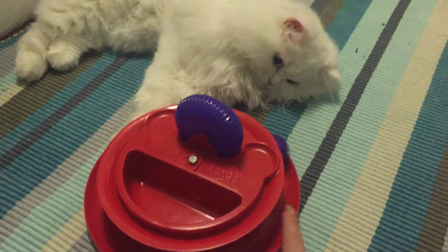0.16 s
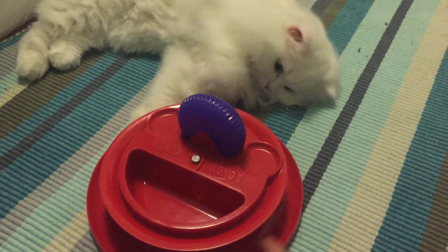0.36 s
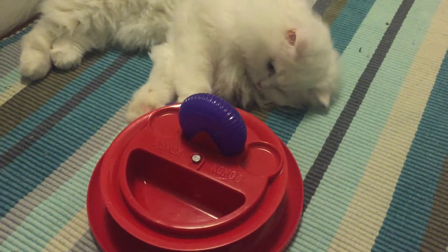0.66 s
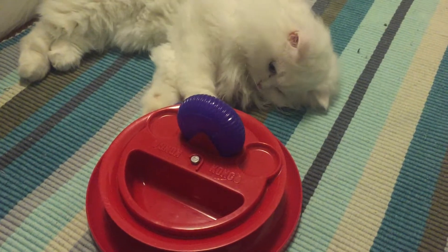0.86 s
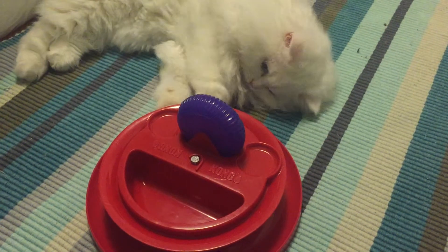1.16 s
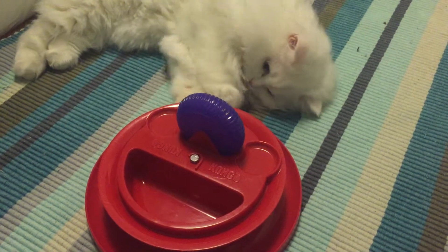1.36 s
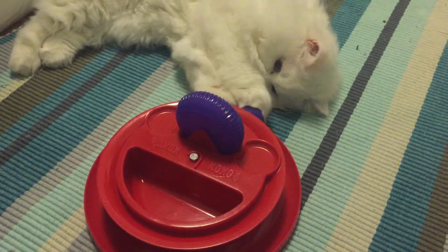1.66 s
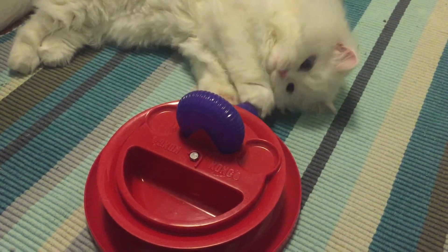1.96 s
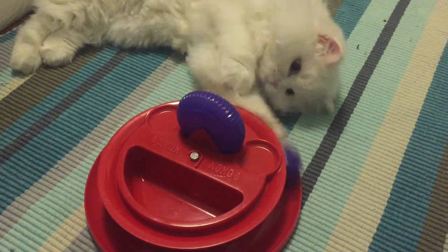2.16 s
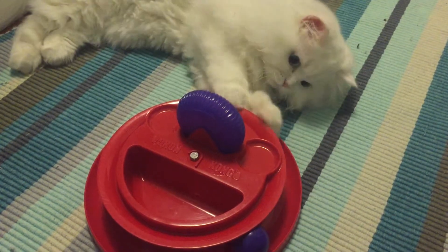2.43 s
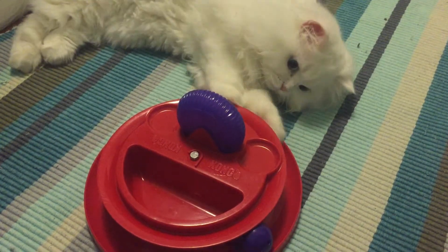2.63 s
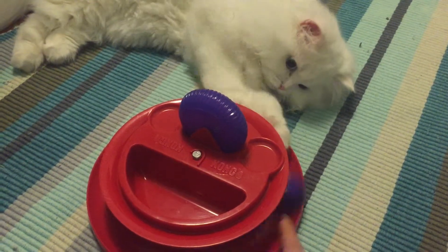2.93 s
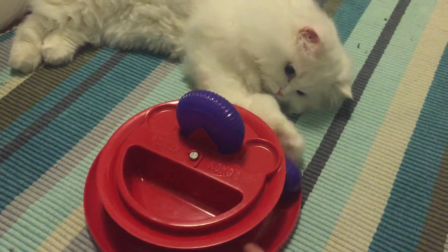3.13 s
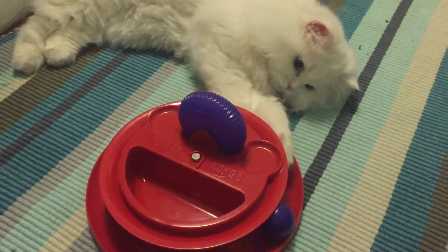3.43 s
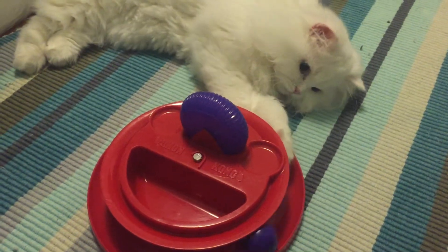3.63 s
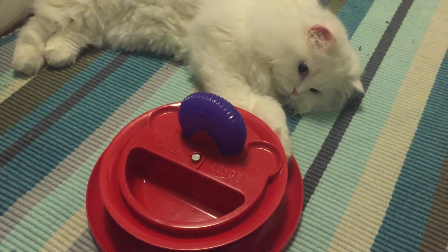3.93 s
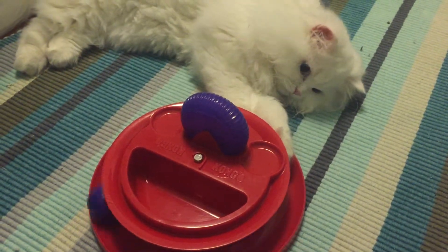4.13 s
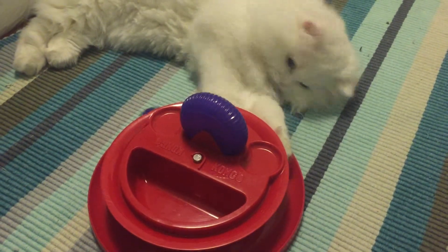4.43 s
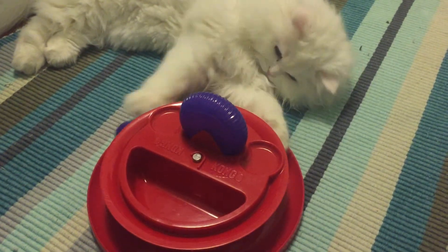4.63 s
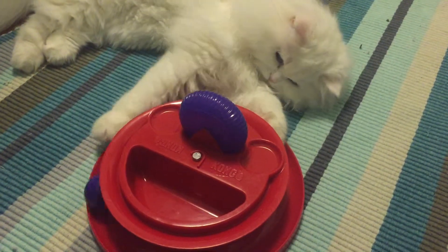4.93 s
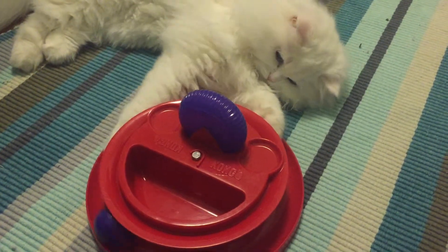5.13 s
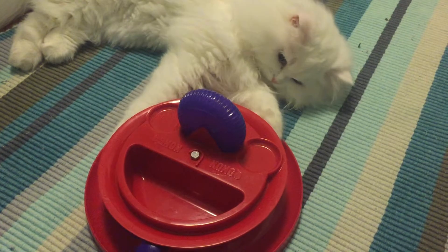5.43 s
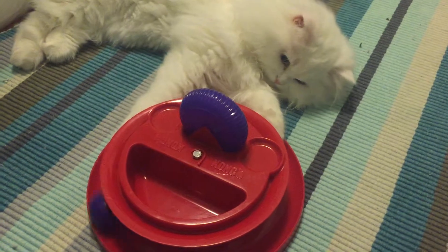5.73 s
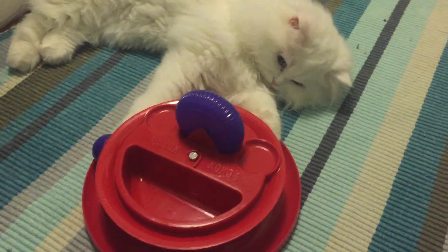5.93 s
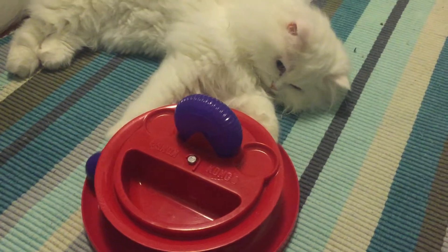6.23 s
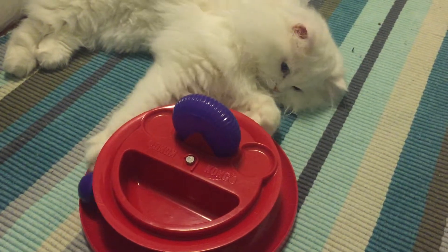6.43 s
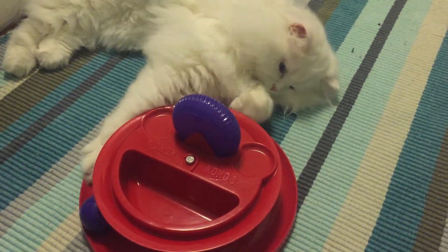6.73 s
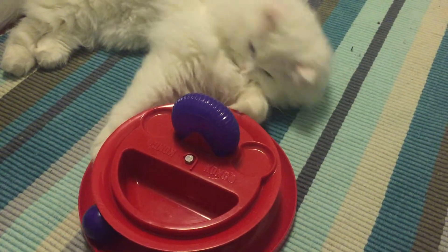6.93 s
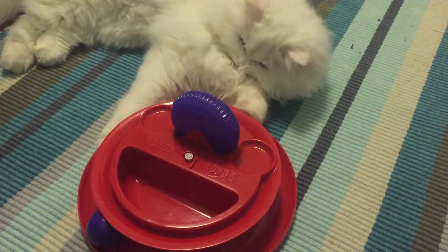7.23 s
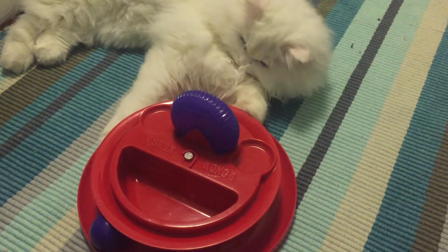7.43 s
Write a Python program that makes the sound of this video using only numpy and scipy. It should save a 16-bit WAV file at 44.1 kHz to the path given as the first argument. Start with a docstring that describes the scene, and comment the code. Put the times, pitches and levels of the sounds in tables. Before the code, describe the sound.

Close-up of a cat's toy: a jingling hard plastic ball rolls, ticks and knocks along its circular track, then fades to faint ticks in a quiet room.

```python
"""A hollow plastic ball with a small bell inside rolls and bounces round a plastic track toy in a quiet room.
Contacts crowd the first 0.7 s and thin out; the hardest come near 2.3 s, then a busy run lasts to about 6.1 s.
Weak ticks and tinkles close the scene; now and then up to 6.5 s a paw thumps softly on the floor.
Contacts excite decaying modes of shell, track wall, hollow base and bell; rolling excites them with many tiny
impacts and friction noise. The paw shakes low floor modes, and an echo and a faint hush surround the toy."""
import sys
import numpy as np
from scipy import signal
from scipy.fft import rfft, irfft, next_fast_len
from scipy.io import wavfile
from scipy.ndimage import uniform_filter1d, map_coordinates

SR = 44100
rng = np.random.default_rng(int(sys.argv[2]) if len(sys.argv) > 2 else 0)


def generate_wav(sig):
    """Save sig (samples, or channels by samples) to the path in sys.argv[1] as 16-bit PCM at SR."""
    pcm = np.round(np.clip(np.atleast_2d(sig).T, -1, 1) * 32767).astype(np.int16)
    wavfile.write(sys.argv[1], SR, pcm)


N = 334278  # samples

# the ball's travel, with control levels for base and rattle and the base pitch under the ball:
# start_s [s], base_db [dB], rattle_db [dB], pitch_hz [Hz]
TRAVEL = [(0.0, -57.5, -67.5, 362), (0.44, -50, -54.5, 399), (0.55, -47.5, -83, 354),
          (0.67, -65.5, -67, 396), (0.97, -86, -70.5, 363), (1.48, -82, -70, 392), (1.81, -94, -76, 350),
          (2.13, -68, -73.5, 393), (2.26, -62, -46, 324), (2.38, -59, -48.5, 376), (2.81, -83, -85, 360),
          (3.02, -75, -47.5, 380), (3.17, -56.5, -52.5, 385), (3.74, -65.5, -82.5, 328),
          (3.88, -64, -61.5, 351), (4.2, -52.5, -55.5, 323), (4.77, -55, -57.5, 403),
          (5.0, -56.5, -71, 328), (5.36, -58, -63.5, 332), (5.51, -63, -62.5, 330), (5.74, -63, -82, 364),
          (5.87, -45.5, -47, 333), (5.97, -50, -73, 358), (6.16, -64.5, -74.5, 387),
          (7.24, -76, -77.5, 350), (7.58, -83, -84.5, 350)]
# ticks on the ball's hard shell: start_s [s], level_db [dB], centre_hz [Hz]
SHELL_TICKS = [(0.0362, -24, 11300), (0.136, -28, 10800), (0.204, -28.5, 10400), (0.232, -25, 10400),
               (0.2508, -43, 12700), (0.285, -33, 12300), (0.3853, -27, 10100), (0.416, -32, 10400),
               (0.4756, -28, 7800), (0.5252, -20.5, 7800), (0.537, -38, 7100), (0.5685, -15.5, 7700),
               (0.617, -26, 9200), (0.6347, -29, 8750), (0.681, -33.5, 7800), (0.717, -44, 7200),
               (1.019, -44.5, 6900), (1.2094, -31, 5400), (1.57, -41, 11300), (1.6288, -35.5, 7800),
               (1.652, -47, 7400), (2.1591, -19, 9400), (2.182, -28, 7460), (2.209, -28.5, 9200),
               (2.2473, -19, 7500), (2.3022, -9, 8540), (2.3185, -24.5, 7760), (2.3354, -24.5, 7100),
               (2.4, -13, 8700), (2.423, -16.5, 7900), (2.431, -30, 8700), (2.453, -15, 8150),
               (2.568, -33, 9600), (2.5788, -21.5, 11200), (2.603, -25.5, 12500), (2.6868, -25.5, 8440),
               (2.7239, -32, 12100), (2.9836, -15.5, 10500), (3.0216, -19, 9200), (3.0385, -21, 9650),
               (3.0538, -22, 10100), (3.059, -14, 10700), (3.0661, -16.5, 6800), (3.0727, -24.5, 7660),
               (3.0768, -36, 10600), (3.0883, -17, 9300), (3.1038, -36, 8500), (3.169, -32, 11200),
               (3.1872, -17, 8100), (3.2218, -19.5, 11200), (3.2401, -22.5, 7550), (3.26, -36, 7600),
               (3.318, -30, 10200), (3.3491, -26.5, 8600), (3.3669, -25.5, 9200), (3.4076, -32.5, 7150),
               (3.5041, -26.5, 8100), (3.549, -27, 11200), (3.5717, -29, 10500), (3.635, -31.5, 7900),
               (3.6617, -30.5, 12400), (4.0126, -23.5, 9400), (4.042, -29.5, 8100), (4.0776, -15, 8530),
               (4.1388, -19, 10200), (4.1654, -16.5, 9000), (4.2926, -33, 10300), (4.311, -26, 12400),
               (4.4349, -29.5, 8040), (4.4598, -31.5, 6700), (4.484, -31.5, 9200), (4.5177, -32, 7200),
               (4.613, -17, 7700), (4.627, -32.5, 8900), (4.7028, -32, 9000), (4.73, -32, 9400),
               (4.7929, -28, 8400), (4.848, -32.5, 9000), (4.879, -34, 9150), (4.927, -33, 11600),
               (4.9458, -27, 10300), (5.143, -20.5, 7140), (5.1894, -19.5, 8600), (5.2338, -32, 11700),
               (5.2512, -32.5, 7100), (5.2645, -28.5, 7900), (5.284, -26.5, 10300), (5.364, -31, 8700),
               (5.393, -27, 7650), (5.6886, -22, 9600), (5.7148, -23.5, 8900), (5.7518, -23, 7600),
               (5.8204, -16.5, 9200), (5.858, -25, 9400), (5.895, -30, 9700), (5.917, -25, 10800),
               (6.035, -33, 11800), (6.058, -30, 9200), (6.317, -48.5, 6900), (6.3305, -43, 12700),
               (6.4257, -45.5, 9100), (6.485, -39.5, 12250), (6.612, -45.5, 11100), (6.6685, -48, 11100),
               (6.7393, -45, 11500), (6.9416, -43, 11800), (7.108, -43.5, 10530), (7.123, -42, 11400)]
# knocks of the ball on the track wall: start_s [s], level_db [dB], centre_hz [Hz]
WALL_KNOCKS = [(0.0488, -34.5, 1980), (0.0992, -28.5, 1180), (0.1171, -26, 2220), (0.2019, -36, 2230),
               (0.2389, -32, 1900), (0.3865, -37, 2260), (0.4835, -25, 1800), (0.5072, -21.5, 1760),
               (0.5236, -19.5, 2000), (0.5546, -25.5, 1730), (0.5684, -20.5, 2370), (0.617, -22.5, 2040),
               (0.6808, -32, 2150), (0.6978, -35, 2090), (1.0186, -45.5, 1930), (1.0296, -48, 2930),
               (1.2046, -34.5, 2340), (1.2094, -19, 2130), (1.407, -48.5, 1880), (1.4436, -35.5, 1400),
               (1.5658, -29, 1240), (1.6295, -29.5, 1830), (1.6511, -46, 1810), (2.0718, -42, 1640),
               (2.1137, -31, 1650), (2.1306, -27.5, 1900), (2.16, -26, 2940), (2.2084, -36, 3000),
               (2.2491, -6, 2080), (2.4013, -16.5, 1270), (2.4224, -23.5, 2330), (2.4543, -29, 1900),
               (2.579, -25.5, 2000), (2.6039, -35, 1870), (2.6867, -34, 2870), (2.7646, -41, 1500),
               (2.8799, -45.5, 1800), (2.9848, -18.5, 1960), (3.0124, -20, 2740), (3.0869, -26.5, 2620),
               (3.1253, -29, 1810), (3.1448, -45, 2100), (3.1847, -31, 2730), (3.2212, -26.5, 2230),
               (3.3475, -35, 1570), (3.4084, -37.5, 2260), (3.5043, -36, 2610), (3.5344, -45, 3000),
               (3.6341, -44, 2990), (3.6616, -43.5, 2690), (3.8427, -47.5, 2730), (3.9045, -46, 2930),
               (3.9818, -45, 1490), (4.0124, -35, 2640), (4.0514, -29.5, 2270), (4.0731, -27.5, 1760),
               (4.1654, -24, 2410), (4.301, -28.5, 2500), (4.351, -25, 1430), (4.5625, -34.5, 2350),
               (4.6122, -23, 2130), (4.6274, -31.5, 2500), (4.7288, -30, 1220), (4.793, -32.5, 2680),
               (4.8807, -30.5, 2500), (5.1425, -29.5, 2880), (5.234, -32, 2270), (5.2639, -38, 2790),
               (5.3627, -52, 2450), (5.3948, -51, 2430), (5.6989, -35, 1810), (5.7498, -26, 2670),
               (5.8197, -24.5, 2240), (5.8646, -31.5, 1770), (5.9836, -22.5, 1510), (6.0571, -32, 2230),
               (6.0766, -27, 1225), (6.084, -33, 1195), (6.0964, -34, 1260), (6.5311, -51, 2360),
               (6.5622, -46, 2200), (6.6238, -45, 1230), (6.8209, -50, 2460), (6.8374, -44, 2620),
               (6.9754, -53, 2720)]
# strokes of the pellet in the bell: start_s [s], level_db [dB]
BELL_STROKES = [(0.1316, -41), (0.5242, -43), (0.5681, -39), (0.617, -36), (1.4087, -54), (1.5663, -56),
                (1.6526, -49), (2.159, -29.5), (2.2363, -28.5), (2.3017, -26), (2.4079, -13),
                (2.5701, -25.5), (2.6868, -41), (2.7347, -39), (3.037, -27), (3.054, -33), (3.0879, -29),
                (3.2231, -30), (3.3578, -32.5), (3.5154, -36.5), (3.5384, -33), (3.6506, -39),
                (3.8586, -35.5), (3.9185, -38.5), (4.0253, -31), (4.0776, -21), (4.0951, -28),
                (4.1684, -23.5), (4.3036, -27.5), (4.4687, -34), (4.5211, -40), (4.6164, -26),
                (4.768, -33.5), (4.9402, -30.5), (5.1893, -29), (5.221, -36), (5.3138, -34),
                (5.3627, -30.5), (5.434, -34), (5.4685, -31.5), (5.5448, -34), (5.5678, -38),
                (5.6965, -32.5), (5.8264, -27), (5.9045, -34), (5.9284, -30.5), (6.1285, -36),
                (6.4213, -45.5), (6.6109, -48), (6.9784, -45.5), (7.0035, -48), (7.1227, -49),
                (7.2429, -49)]
# modes of the hollow base: pitch_hz [Hz], level_db [dB, relative], t60_s [s]
BASE_MODES = [(316.3, -8.5, 0.073), (369.4, -3, 0.071), (444.6, -6, 0.04), (562.4, -16, 0.21)]
# modes of the track wall and trough: pitch_hz [Hz], level_db [dB, relative], t60_s [s]
WALL_MODES = [(704, -3.5, 0.029), (979, -3.5, 0.024), (1135, -6.5, 0.026), (1294, -0.5, 0.0079),
              (1596, -2.5, 0.013), (1896, -4.5, 0.022), (2150, 4.5, 0.0092), (2402, 1, 0.011),
              (2790, 4.5, 0.0088), (2880, -10.5, 0.021), (3253, -6.5, 0.012), (3947, 0.5, 0.0046),
              (4350, -12, 0.014)]
# modes of the ball's shell: pitch_hz [Hz], level_db [dB, relative], t60_s [s]
SHELL_MODES = [(3593, 5, 0.0072), (4330, -9, 0.0039), (5743, -4.5, 0.0068), (6377, -11, 0.0034),
               (6830, -9.5, 0.01), (8310, -7.5, 0.0061), (9313, -12.5, 0.0058), (12000, -16.5, 0.0046),
               (11580, -1.5, 0.0036), (13260, -6, 0.0056), (14600, -7, 0.0061)]
# modes of the small bell: pitch_hz [Hz], level_db [dB, relative], t60_s [s]
BELL_MODES = [(9206, -10.5, 0.075), (9180, -14, 0.039), (9380, -4.5, 0.023), (10270, -21.5, 0.026)]


def amp(db):
    """Decibel law: the amplitude gain of a level in dB."""
    return 10 ** (np.asarray(db) / 20)


def unit(x):
    """Power normalisation: x at rms 1."""
    return x / np.sqrt(np.mean(x ** 2) + 1e-20)


def peak_one(blows):
    """Peak normalisation: each row at peak 1."""
    return blows / np.abs(blows).max(axis=1, keepdims=True)


def along(points, hz):
    """Logarithmic frequency scale: (Hz, value) points interpolated on a log axis."""
    f, v = np.transpose(points)
    return np.interp(np.log(hz + 1), np.log(f + 1), v)


def curves(rows):
    """Linear interpolation: one value per sample for each column after the time."""
    s, *columns = np.transpose(rows)
    return [np.interp(np.arange(N) / SR, s, c) for c in columns]


def wobble(rate):
    """Slow random modulation: a smooth curve through rate random knots a second."""
    return map_coordinates(rng.standard_normal(N // 100), [np.arange(N) * rate / SR])


def filtered(x, response):
    """Linear filtering: the spectrum of x times a response of frequency."""
    m = next_fast_len(N + 8192)
    return irfft(rfft(x, m) * response(np.fft.rfftfreq(m, 1 / SR)), m)[..., :N]


def ring(modes, centre_hz, focus_db, scatter_db, detune, rise):
    """Modal superposition: per centre, a peak-1 blow of decaying sines with random level, tuning and phase."""
    t = np.arange(SR // 10) / SR
    centre_hz = np.asarray(centre_hz)[:, None]
    chance = rng.standard_normal((len(centre_hz), len(modes), 3, 1))
    blows = 0
    for k, (hz, db, t60) in enumerate(modes):
        # focus_db is the loss at one octave from the centre; it grows with the square of the distance
        level_db = db - focus_db * np.log2(hz / centre_hz) ** 2 + scatter_db * chance[:, k, 0]
        tuned_hz = hz * (1 + detune * chance[:, k, 1])
        blows = blows + amp(level_db - 60 * t / t60) * np.sin(2 * np.pi * tuned_hz * t + chance[:, k, 2])
    return peak_one(blows * (1 - np.exp(-t / rise)))


def struck(times, db, blows):
    """Superposition of events: each blow is added at its time and level."""
    at = np.round(np.asarray(times) * SR).astype(int)[:, None] + np.arange(blows.shape[1])
    return np.bincount(at.ravel(), (amp(db)[:, None] * blows).ravel(), N + SR)[:N]


def bumps(rate, spread_db):
    """Random impulse train: rate impacts a second; spread_db above 0 makes a few harder, below 0 a few weaker."""
    draw = rng.random((2, N))
    return (draw[0] < rate / SR) * amp(-spread_db * np.log(draw[1] + 0.0084))


def rubbed(modes, centre_hz, focus_db, detune, rate, spread_db, smooth, roam_db):
    """Source-filter excitation: impacts and friction noise at six roaming places are convolved with modal blows."""
    force = []
    for place in range(6):
        presence = amp(roam_db * wobble(12))
        rub = unit(bumps(rate, spread_db)) + smooth * rng.standard_normal(N)
        force.append(presence * rub)
    # each place has its own colour
    centres_hz = centre_hz * (1 + detune) ** np.linspace(-6, 6, len(force))
    blows = ring(modes, centres_hz, focus_db, scatter_db=8.5, detune=detune, rise=0.00008)
    return unit(signal.fftconvolve(force, blows, axes=1)[:, :N].sum(axis=0))


def with_settling(roll_db, rows, under_db):
    """Power addition: gain of the rolling plus the decaying chatter after each contact, under_db from its level."""
    settle_s = 0.046  # time in which the chatter loses 10 dB
    s, db = np.transpose(rows)[:2]
    t = np.arange(SR // 2) / SR
    fade = np.tile(10 ** (-t / settle_s), (len(s), 1))
    chatter_power = struck(s, 2 * (db + under_db), fade)
    return np.sqrt(amp(2 * roll_db) + chatter_power)


def gritty(blows, depth, seconds):
    """Amplitude modulation by noise: a fast random tremor smears the modes into a dry plastic clack."""
    width = max(round(seconds * SR), 1)
    tremor = unit(uniform_filter1d(rng.standard_normal(blows.shape), width, axis=1))
    return peak_one(blows * (1 + depth * tremor))


def cracked(blows):
    """Broadband impact transient: each blow starts with a short, slightly dull snap of noise."""
    crack_db, crack_s, crack_hz = -3.5, 0.002, 4450  # initial rms against the blow's peak, t60, low-pass edge
    t = np.arange(blows.shape[1]) / SR
    noise = signal.lfilter(*signal.butter(4, crack_hz, fs=SR), rng.standard_normal(blows.shape))
    return blows + amp(crack_db - 60 * t / crack_s) * unit(noise)


def hush():
    """Stationary coloured noise: distant house rumble and microphone hiss with a slowly drifting level."""
    # the room at rest: pitch_hz [Hz], level_db [dB per Hz, relative]
    spectrum = [(15, -38), (28, -15), (76, 9.5), (140, -2), (225, -11), (500, -16.5), (1200, -27.5),
                (2000, -21), (6900, -23), (11800, -25), (15200, -29), (16400, -31)]
    level = amp(-71 + 0.37 * wobble(0.97))
    noise = filtered(rng.standard_normal(N), lambda hz: amp(along(spectrum, hz)))
    return level * unit(noise)


def room(x):
    """Frequency-dependent reverberation: noise tails decay at their own rates, drawn anew each quarter second."""
    # reverberation: pitch_hz [Hz], t60_s [s]
    decay = [(300, 0.4), (2000, 0.29), (10000, 0.21)]
    out, step = np.zeros(N + 2 * SR), SR // 4
    for start in range(0, N, step):
        hz, t, z = signal.stft(rng.standard_normal(SR // 2), SR, nperseg=256)
        fade = amp(-60 * t / along(decay, hz)[:, None])
        tail = signal.istft(z * fade, SR, nperseg=256)[1]
        answer = signal.fftconvolve(x[start:start + step], tail / np.linalg.norm(tail))
        out[start + 200:][:len(answer)] += answer  # 200 samples of delay
    return out[:N]


def paw():
    """Resonance under a soft force: a short swell of noise from the pad excites the low modes of the floor."""
    # paw on the floor: start_s [s], level_db [dB], centre_hz [Hz], decay_s [s]
    thumps = [(0.37, -53, 96.9, 0.03), (0.519, -41, 197, 0.011), (1.489, -47, 99, 0.072),
              (1.778, -39.5, 152, 0.031), (2.236, -65, 215, 0.027), (2.385, -41.5, 188, 0.016),
              (3.02, -49, 210, 0.022), (4.028, -47.5, 161, 0.022), (6.456, -59, 69.7, 0.022)]
    # modes of the floor boards: pitch_hz [Hz], level_db [dB, relative], t60_s [s]
    floor_modes = [(65, -3.5, .12), (91.5, -8.5, 0.31), (143, 2.5, 0.024), (171, -5, 0.16)]
    s, level_db, hz, decay_s = np.transpose(thumps)
    t = np.arange(SR // 4) / SR
    swell = np.tanh(t / 0.027) * np.exp(-t / decay_s[:, None])
    boards = ring(floor_modes, hz, focus_db=15.0, scatter_db=4.5, detune=0.17, rise=0.0029)
    shake = signal.fftconvolve(swell * rng.standard_normal((len(s), len(t))), boards, axes=1)
    return struck(s, level_db - 0.3, peak_one(shake))


def base_rumble():
    """Rolling excitation of a cavity: base and trough answer in uneven lumps, with the pitch under the ball."""
    base_db, _, pitch_hz = curves(TRAVEL)
    lumps = np.tanh(wobble(35) / 2) * 2
    high = np.clip((pitch_hz - 330) / 75, 0, 1)  # power share of the upper base modes
    deep = rubbed(BASE_MODES, centre_hz=332, focus_db=90, detune=0.012,
                  rate=23, spread_db=3, smooth=0.9, roam_db=1.0)
    tight = rubbed(BASE_MODES, centre_hz=410, focus_db=89.5, detune=0.0075,
                   rate=24, spread_db=3, smooth=1.0, roam_db=3.0)
    base = np.sqrt(1 - high) * deep + np.sqrt(high) * tight
    trough = rubbed(WALL_MODES, centre_hz=938, focus_db=57.5, detune=0.0089,
                    rate=15, spread_db=1.5, smooth=0.32, roam_db=0)
    # the trough shakes with the base
    return amp(base_db + 2.0 + 5.0 * lumps) * base + amp(base_db - 20.0 + 10.3 * lumps) * trough


def rattle():
    """Rough-surface excitation: rough patches stir wall and shell together; both settle after contacts."""
    rattle_db = curves(TRAVEL)[1]
    wall_gain = with_settling(rattle_db - 2, WALL_KNOCKS, under_db=-30.5)
    # the shell's level swings 0.92 times as far as its control
    shell_db = -59.5 + 0.92 * (rattle_db + 60) - 9.5
    shell_gain = with_settling(shell_db, SHELL_TICKS, under_db=-29.5)
    grit = amp(3 * wobble(45))
    wall = rubbed(WALL_MODES, centre_hz=1900, focus_db=10.5, detune=0.07,
                  rate=70, spread_db=4, smooth=0.05, roam_db=2.5)
    shell = rubbed(SHELL_MODES, centre_hz=8500, focus_db=9, detune=0.07,
                   rate=50, spread_db=3.5, smooth=0.15, roam_db=2.5)
    return grit * (wall_gain * wall + shell_gain * shell)


def bell_jingle():
    """Repeated micro-impacts: the pellet patters as it skips round the bell, stirred by the rolling."""
    base_db = curves(TRAVEL)[0]
    # the bell's level swings 0.88 times as far as its control
    bell_db = -59 + 0.88 * (base_db + 61.5) - 8
    gain = with_settling(bell_db, BELL_STROKES, under_db=-26.5)
    metal = rubbed(BELL_MODES, centre_hz=9300, focus_db=1.5, detune=0.0026,
                   rate=28, spread_db=1.5, smooth=0.38, roam_db=9.5)
    pellet = rubbed(SHELL_MODES, centre_hz=11500, focus_db=61.5, detune=0.02,
                    rate=37, spread_db=-2.0, smooth=0.1, roam_db=7.5)
    return gain * (metal + amp(-12) * pellet)


def patter():
    """Sparse impulsive excitation: fine ticks of the rattling ball ring wall and shell modes as one set."""
    ticks = rubbed(WALL_MODES + SHELL_MODES, centre_hz=4200, focus_db=2.5, detune=0.046,
                   rate=34, spread_db=3.5, smooth=0.02, roam_db=7)
    return amp(curves(TRAVEL)[1] - 8.5) * ticks


def rolling():
    """Superposition of the rolling sounds, with the bell's level in random flutter."""
    toy_parts = base_rumble() + rattle()
    jingle = bell_jingle()
    toy_parts = toy_parts + patter()
    return toy_parts + amp(6.9 * wobble(40)) * jingle


def bell_tinkles():
    """Beating of close modes: the pellet strikes the thin metal, whose neighbouring modes interfere."""
    s, level_db = np.transpose(BELL_STROKES)
    centres_hz = np.full(len(s), 9300)
    tinkle = ring(BELL_MODES, centres_hz, focus_db=-1.0, scatter_db=-3.0, detune=0.003, rise=0.00043)
    return struck(s, level_db, tinkle)


def base_booms():
    """Impulse response of a cavity: jolts ring the base near its local pitch, and the trough above it."""
    # jolts: start_s [s], base_db [dB], trough_db [dB]
    jolts = [(0.096, -37, -44), (0.116, -35, -47), (0.239, -33.5, -43), (0.347, -32, -45),
             (0.388, -27.5, -41.5), (0.52, -32.5, -32.5), (1.211, -29, -47), (1.279, -45, -59),
             (1.446, -36.5, -48), (1.473, -47, -49), (1.567, -28.5, -42), (1.63, -38, -44),
             (2.077, -41.5, -66), (2.106, -33.5, -52), (2.132, -30.5, -37), (2.25, -19.5, -24),
             (2.334, -37, -40), (2.398, -21.5, -25), (2.423, -44, -49), (2.449, -40, -44),
             (2.571, -35, -36.5), (2.688, -44.5, -52), (2.983, -39.5, -43), (3.008, -26, -31),
             (3.116, -30.5, -34.5), (3.145, -35, -38), (3.223, -33.5, -57), (3.349, -39, -53.5),
             (3.672, -43, -57), (3.982, -43, -54.5), (4.031, -34.5, -38.5), (4.078, -34, -33.5),
             (4.155, -35.5, -40), (4.206, -39, -41.5), (4.241, -34.5, -39), (4.337, -31, -37),
             (4.355, -30.5, -36), (4.434, -35.5, -42.5), (4.61, -38, -46), (4.742, -36, -50),
             (4.901, -37.5, -42), (5.125, -36, -42), (5.366, -40, -51), (5.395, -36.5, -45),
             (5.485, -36.5, -44), (5.707, -38.5, -39.5), (5.78, -38, -39), (5.855, -35.5, -36),
             (5.984, -36, -45), (6.075, -30.5, -44), (6.37, -44, -71), (6.406, -46, -82),
             (6.624, -42, -49.5), (6.94, -54.5, -68), (7.097, -53, -70), (7.431, -54.5, -76)]
    s, base_db, trough_db = np.transpose(jolts)
    pitch_hz = curves(TRAVEL)[-1][np.round(s * SR).astype(int)]
    boom = ring(BASE_MODES, pitch_hz, focus_db=27.5, scatter_db=-1.0, detune=0.028, rise=0.00076)
    trough = ring(WALL_MODES, np.full(len(s), 1000), focus_db=39.5, scatter_db=3, detune=0.025, rise=0.002)
    return struck(s, base_db, boom) + struck(s, trough_db, trough)


def wall_knocks():
    """Impact on a damped plate: the wall's modes chatter and die within milliseconds behind a snap of noise."""
    s, level_db, hz = np.transpose(WALL_KNOCKS)
    knock = ring(WALL_MODES, hz, focus_db=7.5, scatter_db=4.0, detune=0.057, rise=0.00084)
    return struck(s, level_db, cracked(gritty(knock, depth=0.74, seconds=0.0015)))


def shell_ticks():
    """Impact on a stiff shell: high, heavily damped modes make hard ticks that are over at once."""
    s, level_db, hz = np.transpose(SHELL_TICKS)
    tick = ring(SHELL_MODES, hz, focus_db=26.5, scatter_db=3, detune=0.038, rise=0.0003)
    return struck(s, level_db, gritty(tick, depth=0.98, seconds=0.0003))


def scene():
    """Direct and reverberant sound: the toy close by, weak in the deep bass, its echo, the paw and the hush."""
    sources = rolling() + shell_ticks() + wall_knocks() + base_booms() + bell_tinkles()
    toy = filtered(sources, lambda hz: 1 / (1 + (170 / (hz + 1)) ** 4))
    return (toy + paw() + amp(-9) * room(toy) + hush())[None]


def record(dry):
    """Band limitation: a microphone drops steeply by 22 dB above its edge and passes nothing above the top."""
    edge_hz, top_hz = 15400, 16494

    def response(hz):
        """Logistic transition: a smooth step in dB at the edge, then a sharp cut-off."""
        drop = 1 / (1 + np.exp(np.clip((edge_hz - hz) / 90, -50, 50)))
        return amp(-22 * drop) * (hz < top_hz)

    return filtered(dry, response)


dry = scene()
out = record(dry)
generate_wav(out)
```